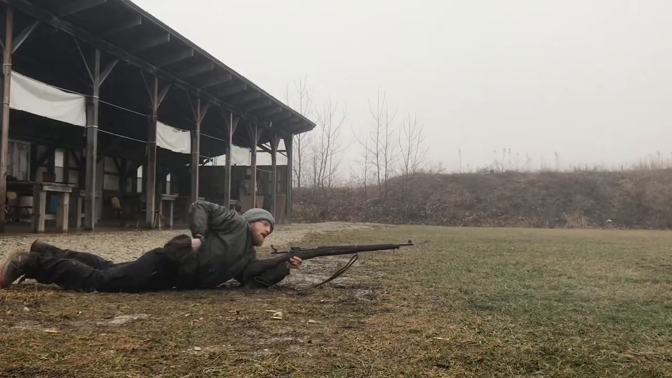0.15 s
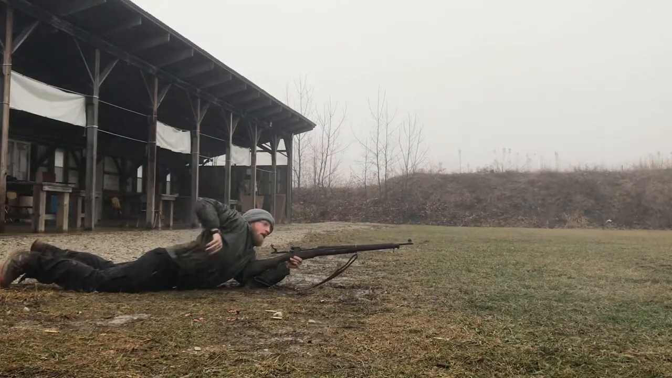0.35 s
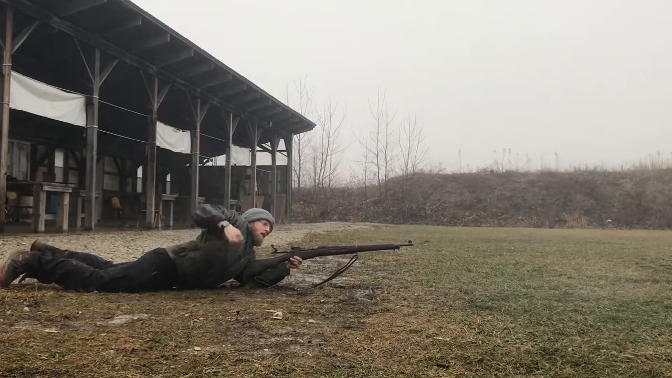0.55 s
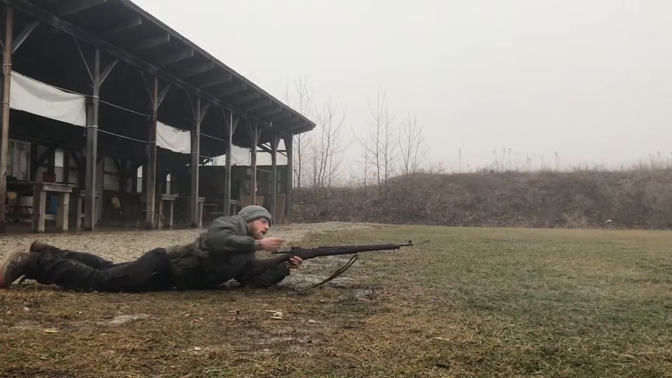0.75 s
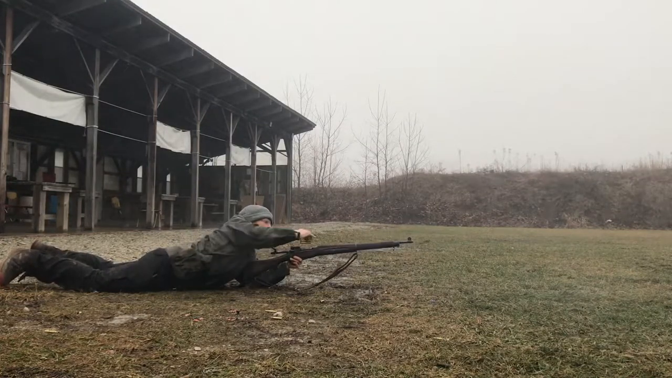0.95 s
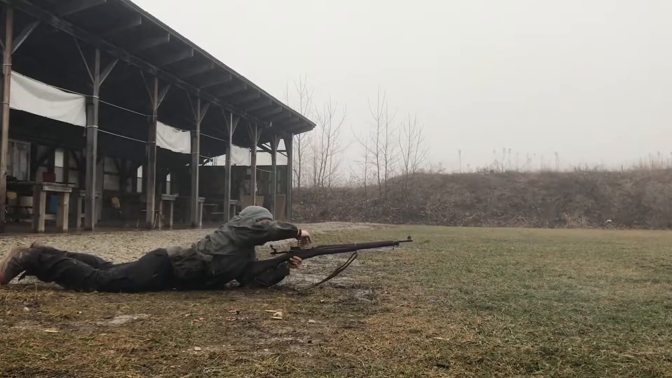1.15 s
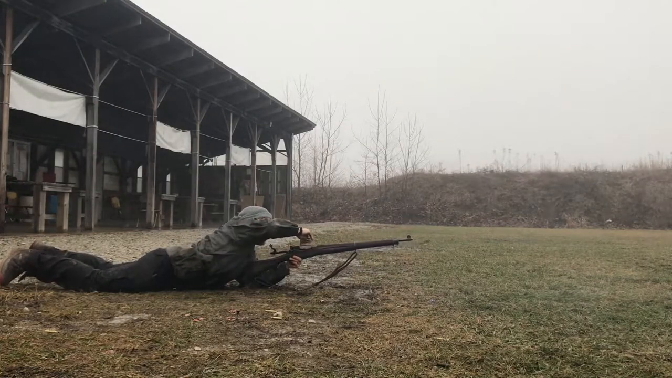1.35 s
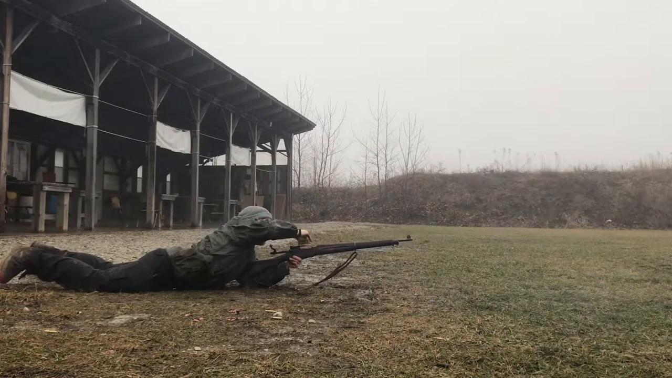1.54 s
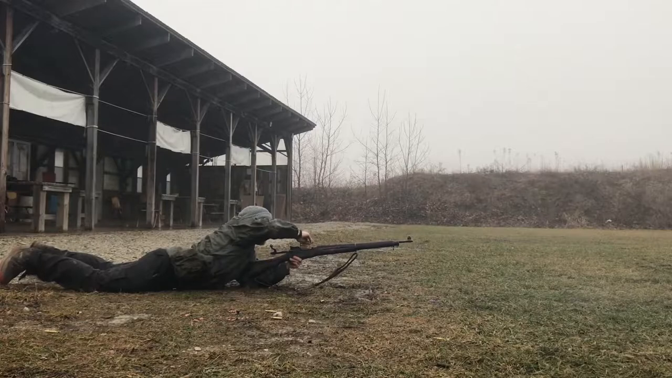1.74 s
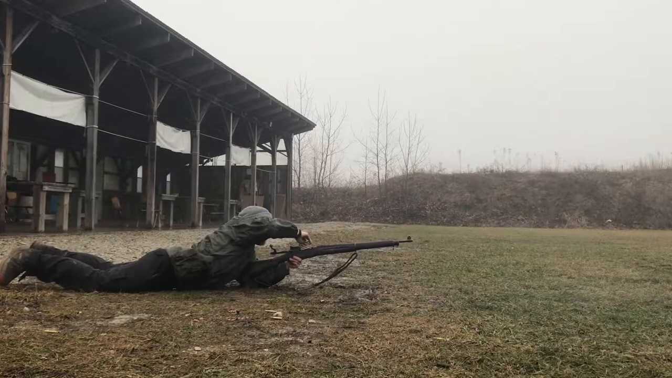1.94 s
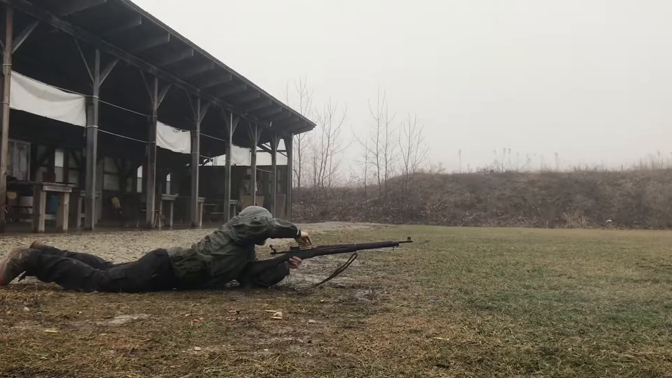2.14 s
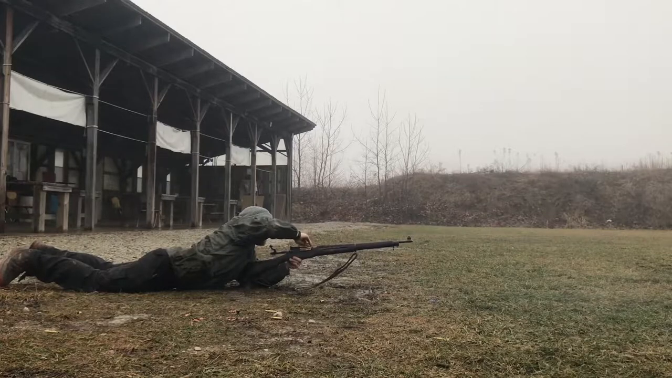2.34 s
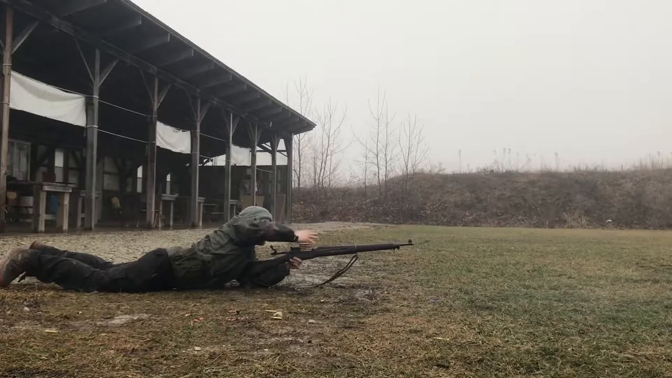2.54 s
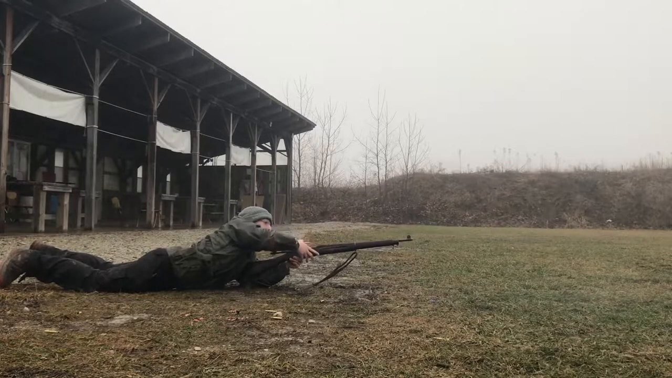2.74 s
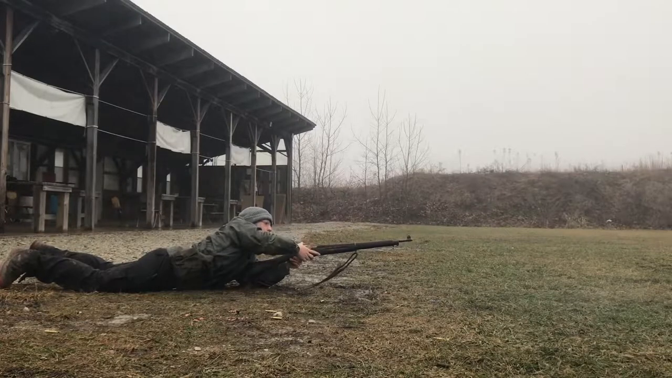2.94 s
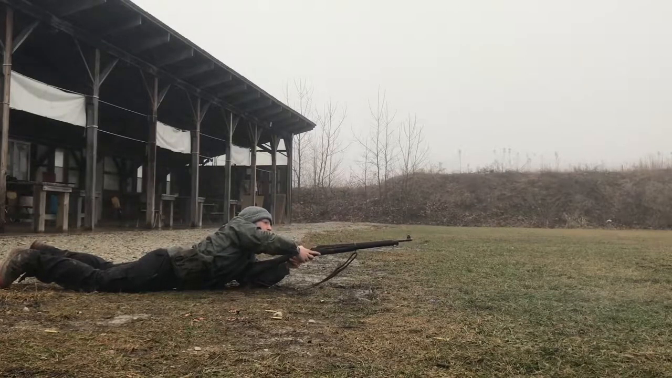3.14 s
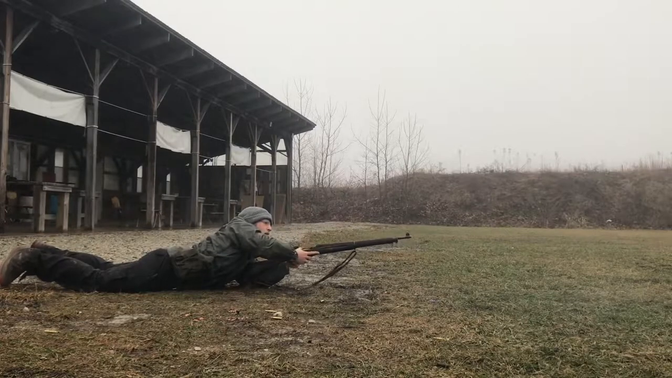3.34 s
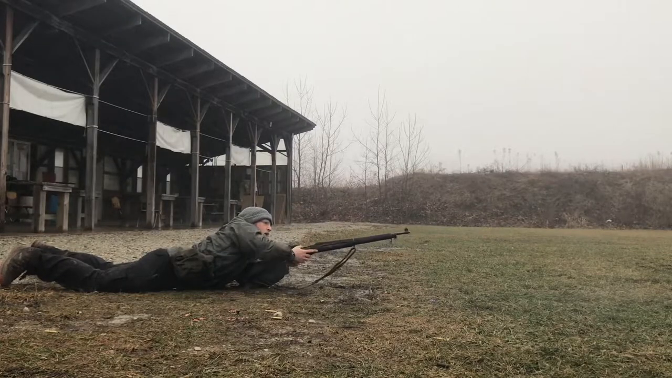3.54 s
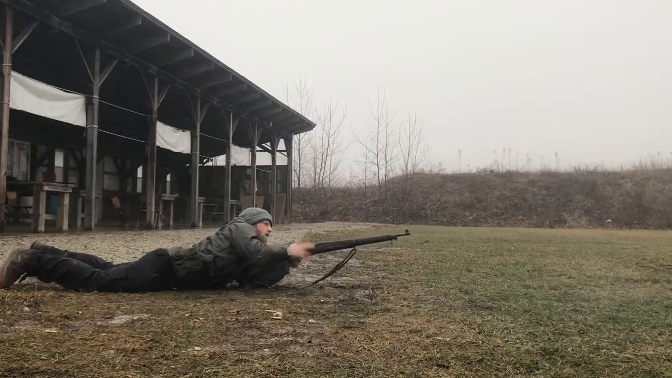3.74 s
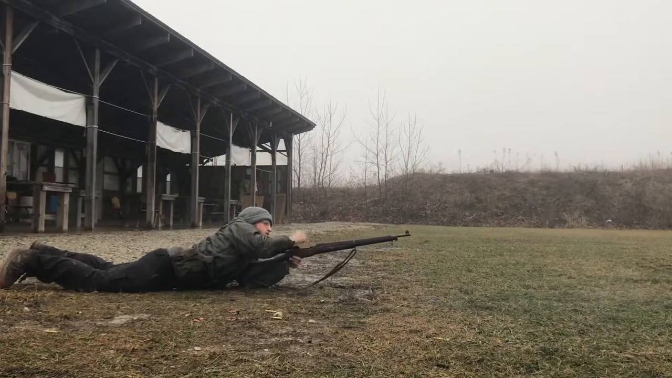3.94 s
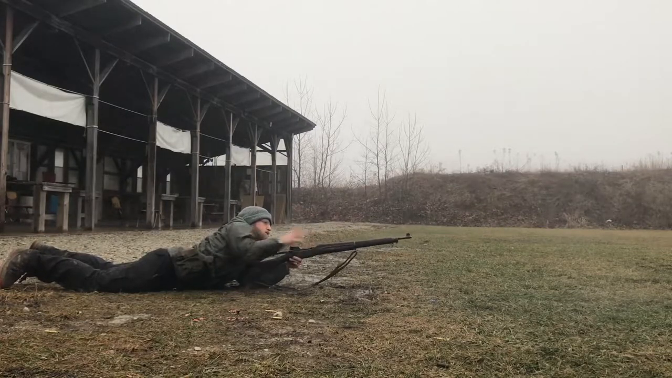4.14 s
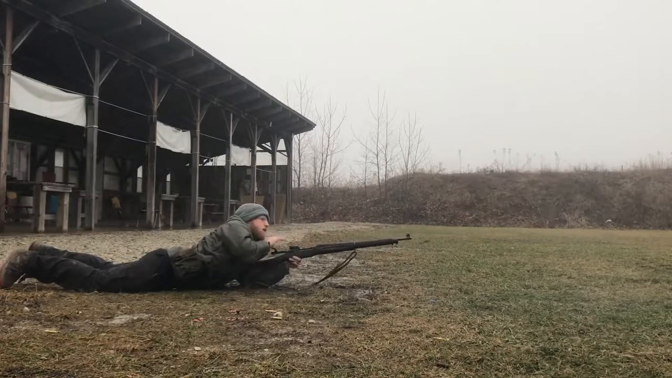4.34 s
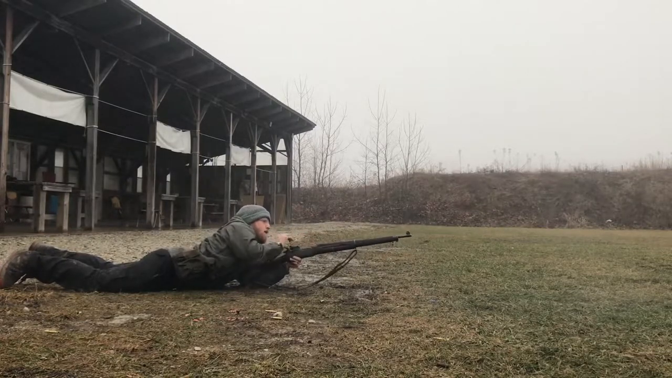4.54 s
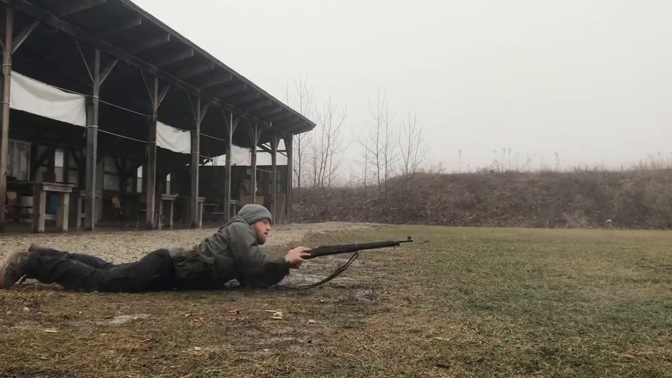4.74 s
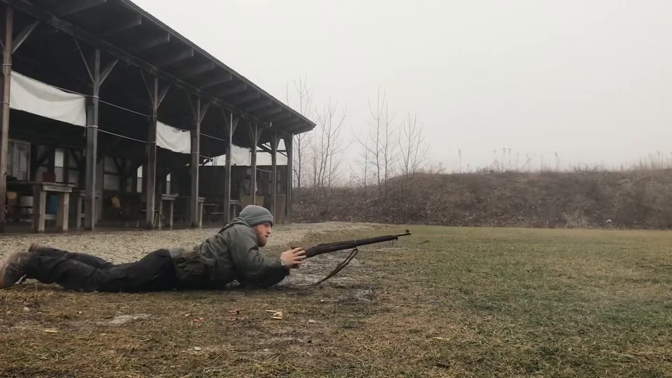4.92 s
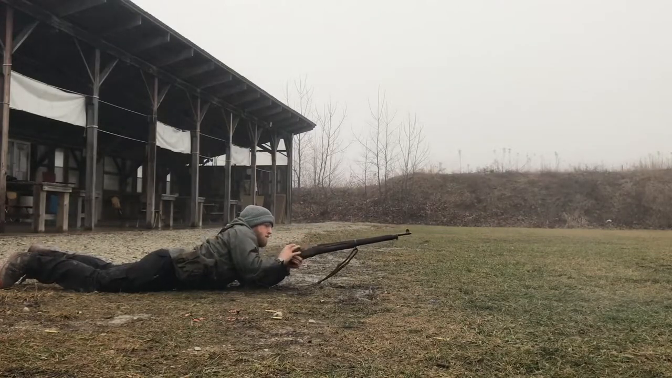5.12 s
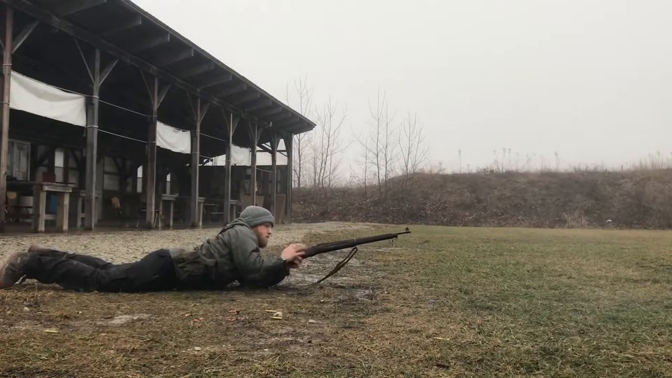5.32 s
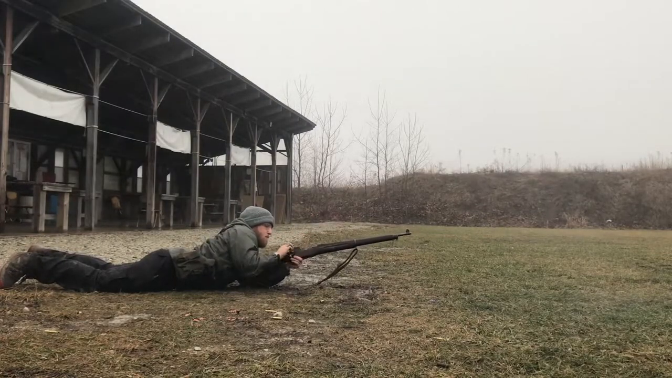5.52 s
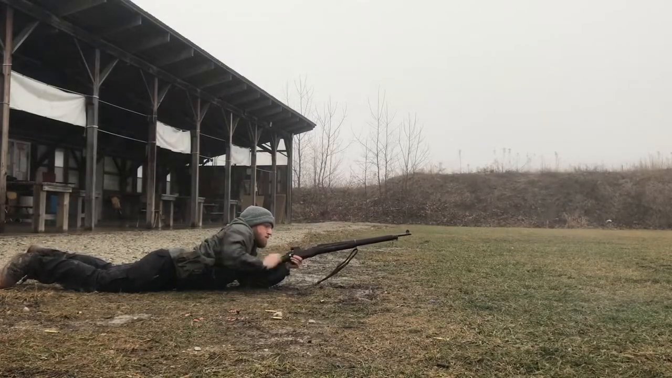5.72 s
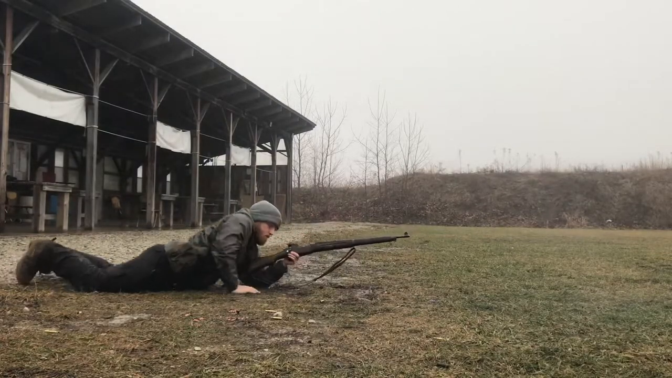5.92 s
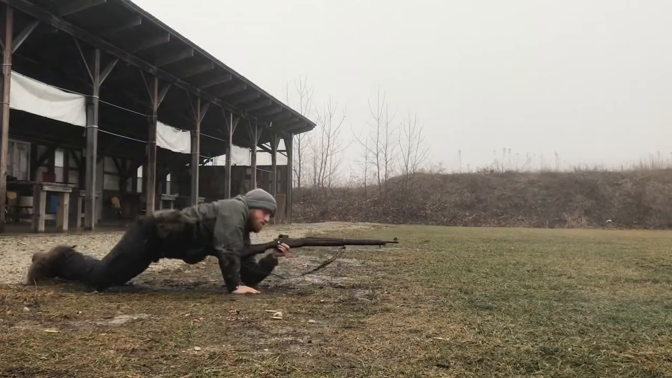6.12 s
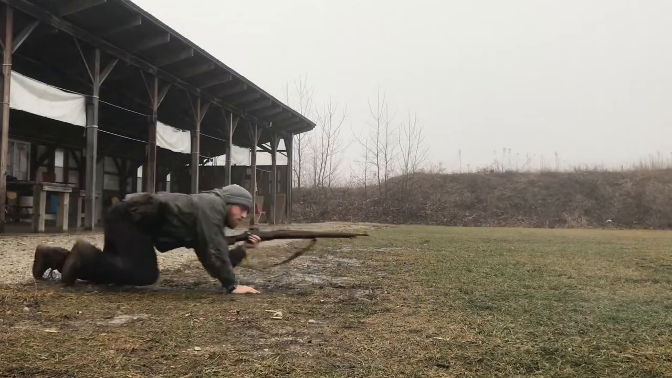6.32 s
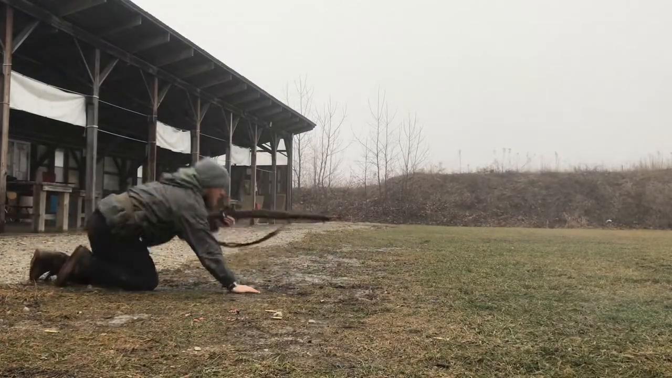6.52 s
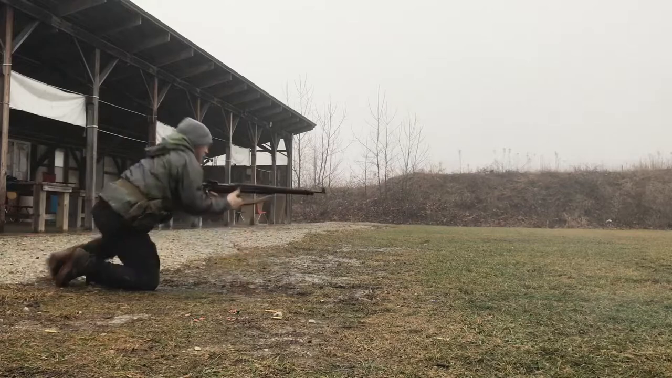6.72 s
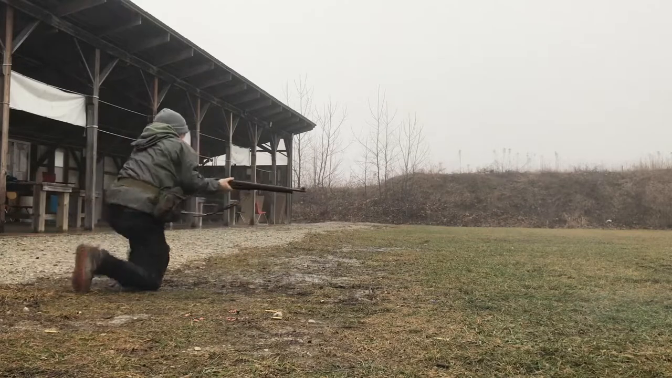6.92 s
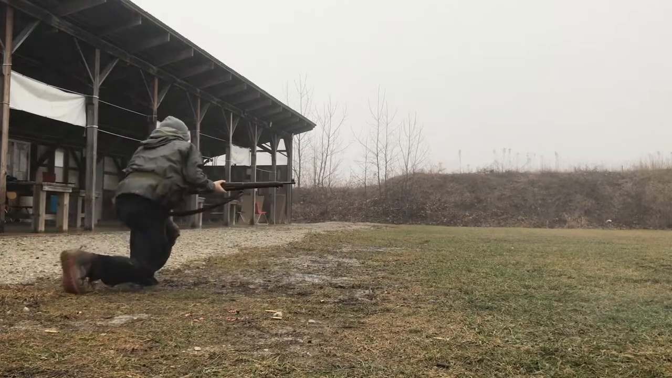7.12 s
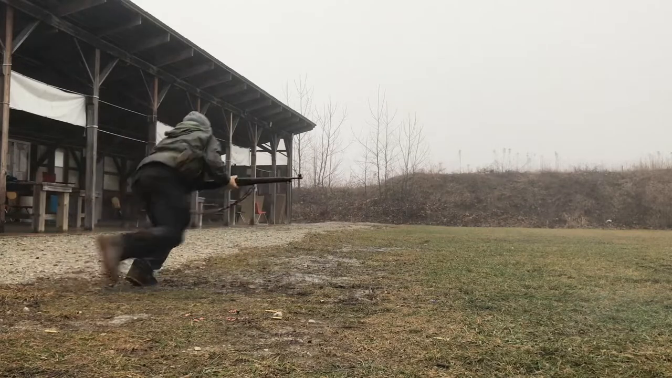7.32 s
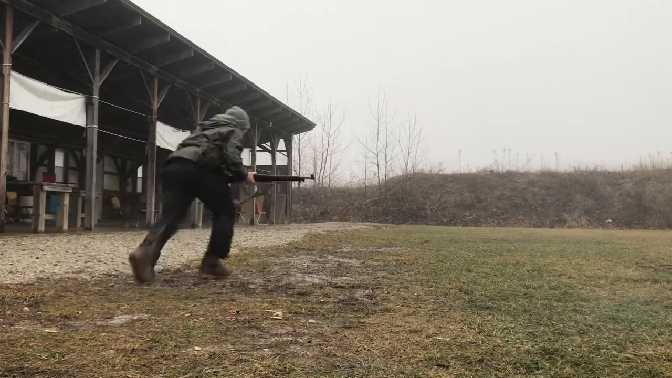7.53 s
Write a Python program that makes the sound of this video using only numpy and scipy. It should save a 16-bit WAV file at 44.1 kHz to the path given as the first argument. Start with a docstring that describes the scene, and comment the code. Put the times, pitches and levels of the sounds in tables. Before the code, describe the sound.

A faint rumble of distant traffic and open-air hiss runs throughout, with a far engine note swelling and fading. In the first second a sleeve rustles softly with a small bump. Light metal ticks follow as a bolt-action rifle is loaded nearby, becoming firmer clicks from 2 to 2.5 seconds. From about 3 to 3.6 seconds comes a run of sharp steel clacks and short slides, some ringing slightly. A click and a sleeve swish come around 4 seconds, then the bolt is worked in a loud, quick cluster from 4.4 to 4.8 seconds. Another sharp clack lands at 5.7 seconds. The metal sounds echo lightly off a wooden shed. From 5.8 seconds the shooter gets up: clothing rustles and rubs, grass crackles, and the rifle rattles lightly. Knees and boots scuff and thud around 6.8, 7 and 7.6 seconds.

```python
"""Wet grass in front of an open wooden shed. A prone shooter loads a bolt-action rifle, works the bolt
and gets up. Chattering steel contacts drive the modes of stock, action and small parts; the bolt rings.
Cloth rustles and rubs, folds and stems crackle, elbows and boots thud. The shed echoes the rifle
over distant traffic rumble and a wavering engine note."""
import sys
import numpy as np
from scipy import signal
from scipy.fft import rfft, irfft
from scipy.io import wavfile
from scipy.ndimage import uniform_filter1d

SR = 44100
rng = np.random.default_rng(int(sys.argv[2]) if len(sys.argv) > 2 else 0)


def generate_wav(signal):
    """Clip the signal to [-1, 1] and save it as 16-bit WAV at the path in sys.argv[1]."""
    frames = np.transpose(np.atleast_2d(signal))
    scaled = np.clip(frames, -1, 1) * 32767
    pcm = np.round(scaled).astype(np.int16)
    wavfile.write(sys.argv[1], SR, pcm)


N = 338247

# Traffic and open air. Each row: frequency in Hz, relative density in dB.
AIR_SPECTRUM = [(26, -25), (48, -3), (74, -4.5), (104, -9), (225, -21.5), (381, -31.5), (503, -35),
                (646, -33.5), (784, -35), (2310, -47), (2880, -46), (10600, -52.5), (15200, -47.5),
                (16500, -54)]
# Far engine. Each row: time in seconds, level in dB.
ENGINE_LEVELS = [(0, -69), (1.8, -78), (2.1, -55), (2.7, -62), (2.9, -54), (4.0, -56.5), (4.7, -82.5),
                 (5.4, -58.5), (6.9, -77), (7.67, -61)]
# Shed decay. Each row: frequency in Hz, t60 in seconds.
SHED_DECAY = [(300, 1), (1000, 0.37), (2200, 0.48), (3000, 0.72), (6000, 0.76), (16000, 0.65)]
# Echo colour. Each row: frequency in Hz, relative gain in dB.
SHED_SPECTRUM = [(300, -11), (900, 9.5), (2000, -0.5), (2550, -3), (2850, -0.5), (3400, -7.5), (4200, -5),
                 (5000, -10.5), (6500, -10), (7800, -7.5), (9200, -5.5), (16000, -2.5)]
# Cloth friction. Each row: frequency in Hz, relative density in dB.
CLOTH_SPECTRUM = [(120, 6), (220, 5), (650, 1.5), (1800, -5.5), (2500, -7), (2950, -2), (4250, -5),
                  (4800, -10.5), (6200, -8.5), (7600, -18.5), (10300, -18.5), (15100, -12.5), (16000, -15)]
# Cloth pressure, one curve a movement. Each row: time in seconds, relative mid-band level in dB.
REACH_LEVELS = [(0, -63), (.12, -65), (.15, -68), (.33, -70), (.5, -82), (.56, -73), (.66, -95), (.76, -77),
                (.84, -69), (.93, -72), (1.1, -83)]
SLEEVE_LEVELS = [(4.12, -66), (4.14, -61.5), (4.25, -63.5), (4.36, -66.5), (4.42, -76.5), (4.5, -71.5),
                 (4.545, -65)]
GET_UP_LEVELS = [(5.69, -73), (5.74, -66), (5.8, -78), (5.86, -58.5), (5.94, -68.5), (6.0, -64.5),
                 (6.12, -60.5), (6.21, -59), (6.27, -60), (6.4, -63), (6.51, -59), (6.66, -66), (6.71, -63),
                 (6.76, -60), (6.89, -62.5), (6.98, -73), (7.05, -58), (7.18, -65.5), (7.25, -61),
                 (7.3, -69.5), (7.41, -69), (7.46, -68.5), (7.55, -65.5), (7.6, -62), (7.67, -58)]
# Sleeve, elbow, knee and boot scuffs. Each row: peak time in seconds, relative mid-band level in dB,
# rise and fall in seconds, hiss and body in dB against the mid band.
CLOTH_SCUFFS = [(.335, -67, 0.025, 0.016, 4, -6), (.44, -68, 0.16, 0.085, 4.5, -4),
                (.57, -67, 0.05, 0.097, 4, 4), (.79, -67.5, 0.082, 0.072, 8, 6.5),
                (4.127, -54, 0.0014, 0.015, 3, 6.5), (6.0, -67.5, 0.059, 0.075, 10, 6),
                (6.371, -54.5, 0.0059, 0.015, 5.5, -3), (6.809, -46.5, 0.06, 0.022, -1, -2.5),
                (6.89, -58, 0.03, 0.035, 6.5, -4), (7.022, -45.5, 0.0084, 0.014, -2, 4.5),
                (7.34, -60.5, 0.078, 0.086, -14, -1), (7.651, -46, 0.02, 0.059, 0, -6.5)]
# Hand, sleeve and sling rubs. Each row: start and end in seconds, pitch and width in Hz, level in dB.
HOLLOW_RUBS = [(0, 0.128, 950, 260, -58.5), (0, 0.135, 3600, 420, -65.5), (0, 0.124, 5570, 500, -76),
               (0.145, 0.248, 765, 200, -67.5), (0.728, 0.873, 4540, 2500, -69.5),
               (4.138, 4.363, 3450, 300, -71.5), (6.02, 6.25, 3040, 495, -69),
               (6.483, 6.53, 2900, 600, -56), (6.761, 6.826, 2930, 900, -52.5),
               (7.016, 7.043, 2500, 1310, -39.5), (7.6, 7.655, 1150, 600, -53)]
# Fingers, folds, stems and sling. Each row: start in seconds, peak in dB, pitch in Hz.
FAINT_CRACKLES = [(0.441, -52, 4500), (0.693, -58, 2460), (.706, -56, 3850), (0.9016, -49, 5700),
                  (1.222, -53.5, 4640), (1.276, -62, 3600), (1.396, -63, 4050), (1.69, -55, 1670),
                  (2.589, -54.5, 2520), (2.734, -56, 1880), (2.761, -53, 6200), (2.8026, -52.5, 2940),
                  (2.8223, -54, 2200), (2.841, -54, 2500), (3.7357, -52, 3530), (4.1, -53, 3020),
                  (4.134, -45, 3220), (4.6302, -48, 3930), (6.061, -41, 3040), (6.17, -52, 3400),
                  (6.201, -45, 3270), (6.257, -42, 2930), (6.4078, -37, 2920), (6.681, -48, 3000),
                  (6.762, -50, 4200), (6.804, -41, 3280), (6.833, -42.5, 5500), (7.048, -45, 2940),
                  (7.082, -48, 1500), (7.198, -50, 4560), (7.309, -49, 3800), (7.326, -54, 4500),
                  (7.356, -66, 4800), (7.384, -55, 3300), (7.509, -54, 2600), (7.553, -49, 2000),
                  (7.624, -49, 4200)]
# Bolt, elbow, knee and boot knocks. Each row: start in seconds, level in dB, pitch in Hz, t60 in seconds.
DULL_KNOCKS = [(0.319, -66, 166, 0.025), (0.549, -45.5, 147, 0.03), (4.124, -47, 288, 0.064),
               (5.756, -37.5, 725, 0.0065), (5.776, -39.5, 194, 0.011), (6.797, -46.5, 313, 0.12),
               (6.823, -44, 213, 0.072), (7.002, -47.5, 280, 0.085), (7.02, -50, 115, 0.07),
               (7.601, -47.5, 149, 0.053), (7.643, -38.5, 177, 0.036)]
# Bolt ringing. Each row: start in seconds, level in dB, seconds until a touch damps it.
BOLT_RINGS = [(2.049, -67, .036), (2.976, -65, .05), (3.09, -67, .05), (3.149, -54, .09), (3.623, -65, .12),
              (4.431, -79, .05), (4.57, -56, .05), (4.671, -64, .03), (4.702, -68, .04),
              (5.667, -61, 0.032)]
# Wooden stock, steel action, small parts. Each row: frequency in Hz, width in Hz, relative gain in dB.
STOCK_MODES = [(683, 200, -4.5), (800, 240, -3), (1110, 390, -9.5), (1745, 53, -10)]
ACTION_MODES = [(2790, 305, -1), (3450, 810, -7.5), (4190, 620, 2), (5260, 380, -5), (6180, 800, -3)]
SMALL_PART_MODES = [(8360, 1200, 0.5), (9660, 220, 5.5), (11500, 380, -9.5), (12940, 6500, 0),
                    (16140, 690, -5)]
# Metal contacts. Each row: start in seconds, action level over 5 ms in dB, struck part in Hz, stock in dB
# against the action, stock pitch in Hz, small parts in dB against the action, nominal decay in seconds.
CONTACTS = [(0.409, -58, 4540, -5, 1460, -9, 0.094), (0.489, -59.5, 4500, -24, 670, -7, 0.016),
            (0.718, -67.5, 7100, -18, 700, 11, 0.022), (0.883, -53.5, 6240, -28, 930, -1, 0.028),
            (0.912, -83.5, 2430, 26, 890, -9, 0.0091), (1.165, -60.5, 4200, 5.5, 950, 0, 0.031),
            (1.2888, -61, 4700, -2, 1310, -0.5, 0.047), (1.301, -63.5, 4670, -6, 1100, 0, 0.016),
            (1.37, -61, 6460, -20, 1250, 7, 0.019), (1.5091, -54.5, 4570, -8, 1000, -1, 0.02),
            (1.512, -54, 4800, -1.5, 1300, 2, 0.027), (1.526, -66.5, 3800, 12, 990, -4, 0.042),
            (1.5403, -53, 2920, 4.5, 960, -5, 0.017), (1.6487, -59, 6000, 7.5, 1330, -24, 0.021),
            (1.8114, -59.5, 6240, -4.5, 800, 3, 0.031), (1.9426, -63.5, 4400, -6, 1000, 0, 0.028),
            (1.988, -40.5, 6330, -11, 1720, -1.5, 0.016), (1.995, -56, 6100, -1.5, 1430, 5, 0.026),
            (2.0477, -48, 4000, -5.5, 1340, 6.5, 0.028), (2.0849, -49, 4240, -4, 1720, -12, 0.021),
            (2.092, -64, 4430, 4, 1700, -5, 0.082), (2.1232, -46.5, 6440, -4.5, 1700, 4, 0.034),
            (2.408, -43, 3430, 1.5, 905, -2, 0.025), (2.4275, -51, 2800, -20, 1100, -2, 0.014),
            (2.451, -50.5, 4920, -7, 1790, -12, 0.042), (2.4605, -53, 4770, 0, 1770, -7, 0.052),
            (2.49, -78, 6200, -8, 950, 20, 0.021), (2.556, -53.5, 4160, -1, 960, -9.5, 0.025),
            (2.864, -60, 5000, 2.5, 800, -23, 0.025), (2.9712, -39.5, 3900, -11, 870, -6, 0.024),
            (2.9753, -33.5, 3140, -10.5, 1760, -1.5, 0.021), (3.09, -38.5, 5270, -7, 1740, -4.5, 0.018),
            (3.1392, -37, 4670, -13, 1650, -11, 0.048), (3.1557, -33.5, 3050, -9, 1750, -4, 0.023),
            (3.238, -53, 4100, 0, 835, -4.5, 0.02), (3.269, -51.5, 3700, -21, 1000, -18, 0.021),
            (3.398, -33, 3540, -12.5, 1340, -24, 0.03), (3.411, -38, 4600, -10, 1960, -6.5, 0.0074),
            (3.4142, -45, 4170, -2, 1110, -4, 0.068), (3.4284, -46.5, 4960, -14, 970, 0, 0.02),
            (3.564, -44.5, 4060, -15, 1920, -1.5, 0.032), (3.6222, -42.5, 3340, -12, 1770, -6, 0.022),
            (3.626, -42, 3470, -3.5, 1740, -1.5, 0.024), (3.759, -60.5, 5240, 2.5, 930, -6, 0.036),
            (4.0026, -54.5, 3960, -18, 1500, -6, 0.063), (4.0232, -42.5, 3900, -15, 786, 1, 0.021),
            (4.4227, -55, 3700, 3, 684, -3, 0.061), (4.4303, -41.5, 5300, -6.5, 1670, -13, 0.017),
            (4.5676, -30.5, 4700, -13.5, 1040, 1.5, 0.04), (4.574, -34.5, 4250, -7.5, 1760, -4, 0.018),
            (4.5791, -38, 3660, -4.5, 734, 2.5, 0.022), (4.625, -49.5, 2800, -20, 2100, -8, 0.013),
            (4.6603, -45, 6940, -8.5, 1310, 1.5, 0.016), (4.67, -35.5, 6400, -5, 1430, 2, 0.031),
            (4.719, -68, 3370, 14, 1490, -16, 0.022), (4.784, -49, 3870, -4, 1027, -6, 0.055),
            (4.793, -34.5, 6260, -17, 1730, 0.5, 0.0027), (4.8, -32, 3580, -1.5, 610, -11, 0.02),
            (4.829, -63, 3320, 11, 910, 6, 0.014), (5.634, -62, 4330, -15, 1300, -2, 0.012),
            (5.644, -47, 4370, -3, 1300, -10, 0.023), (5.6586, -45.5, 4020, 2, 1440, -24, 0.061),
            (5.6653, -31.5, 6030, -6, 1260, 0, 0.0095), (5.974, -48.5, 3340, -6.5, 1870, -6, 0.073),
            (6.359, -63, 2980, -6, 1290, 7, 0.017), (6.4367, -52.5, 2900, -7, 1220, -6, 0.032),
            (6.5292, -54, 4000, -24, 1610, 0.5, 0.065), (6.622, -57.5, 4000, -15, 730, 2, 0.033),
            (7.5273, -57, 3660, -0.5, 1210, 1.5, 0.017), (7.574, -48, 2430, -3, 1760, -27, 0.06),
            (7.592, -46.5, 2930, -2.5, 1140, -25, 0.036), (7.6413, -41.5, 5260, -2.5, 2030, 0.5, 0.027)]
# Parts sliding home. Each row: as in CONTACTS, then rise in seconds.
SLIDES = [(2.39, -59, 3720, 3, 1000, 6, 0.025, 0.017), (2.941, -58, 4000, -9, 1000, -2, .02, 0.023),
          (2.962, -42, 3050, 3, 940, -4, 0.057, 0.0055), (3.147, -31, 4770, -5.5, 950, -4, 0.029, 0.0014),
          (3.38, -47, 3480, -8, 765, -23, 0.037, 0.0092), (3.557, -47.5, 3740, -7, 1780, -2, 0.047, 0.0017),
          (4.526, -48, 3670, -4.5, 1110, -22, 0.068, 0.0034),
          (4.546, -35, 3440, -2, 1560, -9, 0.041, 0.0069),
          (4.699, -35.5, 3500, -4, 1440, -12, 0.017, 0.0032)]


def gain_of(db):
    """Decibels to amplitude."""
    return 10 ** (np.asarray(db) / 20)


def unit_rms(x):
    """Scales to rms 1."""
    return x / np.sqrt(np.mean(abs(x) ** 2) + 1e-20)


def curve_at(points, hz):
    """Interpolates a table over log frequency."""
    table_hz, value = np.transpose(points)
    return np.interp(np.log(hz + 1), np.log(table_hz + 1), value)


def add(mix, start_s, sound):
    """Mixes a sound in at start_s."""
    part = mix[round(start_s * SR):][:len(sound)]
    part += sound[:len(part)]


def resonance(hz, centre_hz, width_hz):
    """Complex response of one mode."""
    return 1 / (1 + 1j * (hz ** 2 - centre_hz ** 2) / (hz + 1) / width_hz)


def modes(table, hz, coupling):
    """Sum of modes; the contact point sets the sign and strength of each."""
    return sum(np.sign(drive) * gain_of(db + 0.63 * min(abs(drive), 1.5)) * resonance(hz, mode_hz, width)
               for (mode_hz, width, db), drive in zip(table, coupling))


def noise(db, size):
    """Noise from random short-time spectra; db is bins x frames."""
    real, imag = rng.standard_normal((2,) + db.shape[::-1]).transpose(0, 2, 1)
    return signal.istft((real + 1j * imag) * gain_of(db), nperseg=size, noverlap=size * 3 // 4)[1][:N]


def patches(frames, bins, long, wide):
    """Random blobs over time and frequency, rms 1."""
    streaks = uniform_filter1d(rng.standard_normal((frames, bins)), long, axis=0)
    return unit_rms(uniform_filter1d(streaks, wide, axis=1)).T


def air(level_db=-57):
    """Distant traffic rumble and faint open-air hiss."""
    frames, hz = N // 512 + 5, np.fft.rfftfreq(2048, 1 / SR)
    spectrum_db = curve_at(AIR_SPECTRUM, hz)[:, None] + patches(frames, len(hz), long=8, wide=12)
    return gain_of(level_db) * unit_rms(noise(spectrum_db, size=2048))


def engine(pitch_hz=97, waver_hz=1.56):
    """A far engine: one wavering note that swells and fades."""
    drift = unit_rms(uniform_filter1d(uniform_filter1d(rng.standard_normal(N), 5000), 5000))
    note = np.sin(2 * np.pi * np.cumsum(pitch_hz + waver_hz * drift) / SR)
    return gain_of(np.interp(np.arange(N) / SR, *np.transpose(ENGINE_LEVELS))) * note


def shed_echo(sound, pattern, gap_s=0.009, turn_s=0.693):
    """Sparse echoes off posts and roof; each band dies at its own rate."""
    taps = np.zeros(SR)
    arrivals = np.arange(0, SR - 20, 20) + rng.integers(0, 20, (SR - 1) // 20)
    taps[arrivals] = rng.choice([-1., 1.], len(arrivals))
    hz, t, spectra = signal.stft(taps, SR, nperseg=256)
    build = np.clip((t - gap_s) / 0.0094, 0, 1)
    far_end = 1 + 0.41 * np.exp(-((t - 0.08) / 0.052) ** 2)
    decay_db = curve_at(SHED_SPECTRUM, hz)[:, None] - 60 * t / curve_at(SHED_DECAY, hz)[:, None]
    echo = signal.istft(spectra * build * far_end * gain_of(decay_db), SR, nperseg=256)[1]
    # Patterns 0 and 1 take turns as the shooter shifts.
    share = np.cos(np.pi * (np.arange(N) / SR / turn_s + pattern / 2))
    return signal.fftconvolve(sound * share, echo / np.linalg.norm(echo))[:N]


def cloth_power(t, scuff_drop_db=13.5):
    """Friction power of movements and scuffs in three bands: mid, hiss, body."""
    power = np.full((3, len(t)), 1e-12)
    movements = (REACH_LEVELS, -2, 6.5), (SLEEVE_LEVELS, 3.5, 2), (GET_UP_LEVELS, -1.8, 1.8)
    for curve, hiss_db, body_db in movements:
        times_s, level_db = np.transpose(curve)
        bands_db = np.interp(t, times_s, level_db) + np.array([[0], [hiss_db], [body_db]])
        power += gain_of(2 * bands_db) * ((t >= times_s[0]) & (t <= times_s[-1]))
    for peak_s, level_db, rise_s, fall_s, hiss_db, body_db in CLOTH_SCUFFS:
        mid_db = level_db - scuff_drop_db * np.maximum((peak_s - t) / rise_s, (t - peak_s) / fall_s)
        power += gain_of(2 * (mid_db + np.array([[0], [hiss_db], [body_db]])))
    return power


def cloth(fibres_per_s=120):
    """Patchy friction hiss; blades and folds snap as broadband grains, fibres let go."""
    frames, hz = N // 64 + 5, np.fft.rfftfreq(256, 1 / SR)
    bands = (hz > 1700) & (hz < 7000), hz >= 7000, hz <= 1700
    colour_db = curve_at(CLOTH_SPECTRUM, hz)
    db = np.zeros((len(hz), frames))
    for band, power in zip(bands, cloth_power(np.arange(frames) * 64 / SR)):
        db[band] = colour_db[band, None] + 10 * np.log10(power / np.sum(gain_of(2 * colour_db[band])))
    snaps_db = 1.45 * np.minimum(rng.exponential(1, frames), 4)
    db += snaps_db * np.clip(0.63 + 1.03 * patches(frames, len(hz), long=1, wide=14), 0, 2)
    db += 1.67 * patches(frames, len(hz), long=14, wide=6)
    fibres = rng.exponential(1, N) * (rng.random(N) < fibres_per_s / SR)
    grit = 30 * uniform_filter1d(fibres, 30)
    return gain_of(-2.5) * noise(db, size=256) * (1 + 0.7 * grit)


def rub(length_s, pitch_hz, width_hz, level_db, rise_s=0.0087, stop_s=0.041):
    """Friction noise through a hollow resonance, stopping short."""
    t, hz = np.arange(16384) / SR, np.fft.rfftfreq(16384, 1 / SR)
    hollow = irfft(rfft(rng.standard_normal(len(t))) * resonance(hz, pitch_hz, width_hz) ** 2)
    envelope = np.clip(np.minimum(t / rise_s, (length_s - t) / stop_s), 0, 1)
    return gain_of(level_db) * unit_rms(hollow) * envelope


def crackle(peak_db, pitch_hz, t60_s=0.01, low_hz=700, high_hz=6000):
    """A brief noise burst, part broad, part resonant."""
    t, hz = np.arange(2048) / SR, np.fft.rfftfreq(2048, 1 / SR)
    burst = rfft(rng.standard_normal(len(t)) * np.minimum(t / 0.0011, 1) * gain_of(-60 * t / t60_s))
    broad = unit_rms(irfft(burst * (1j * hz / (low_hz + 1j * hz)) ** 2 / (high_hz + 1j * hz) ** 2))
    pitched = unit_rms(irfft(burst * resonance(hz, pitch_hz, width_hz=400)))
    sound = pitched + gain_of(-8) * broad
    return gain_of(peak_db) * sound / abs(sound).max()


def thud(level_db, pitch_hz, t60_s, rise_s=0.00078):
    """A damped low push with a dull puff of soil."""
    t = np.arange(6000) / SR
    band = signal.butter(1, [0.55 * pitch_hz, 2.3 * pitch_hz], "band", fs=SR)
    puff = unit_rms(signal.lfilter(*band, rng.standard_normal(len(t))))
    push = np.sin(2 * np.pi * pitch_hz * t)
    return gain_of(level_db - 60 * t / t60_s) * (push + 0.67 * puff) * (1 - np.exp(-t / rise_s))


def bolt_ring(level_db, free_s, pitch_hz=9260, t60_s=0.22):
    """The loose bolt's long high mode flutters until a touch damps it."""
    t = np.arange(12000) / SR
    gate = np.minimum(t / 0.0021, 1) * np.clip((free_s - t) / 0.008 + 1, 0, 1)
    flutter_db = 5 * unit_rms(uniform_filter1d(rng.standard_normal(len(t)), 150))
    return gain_of(level_db + flutter_db - 60 * t / t60_s) * np.sin(2 * np.pi * pitch_hz * t) * gate


def click(level_db, part_hz, stock_db, stock_hz, small_db, decay_s, rise_s=0.0011):
    """Contact chatter drives the rifle's modes. Returns the direct sound and the snap sent all around."""
    t, hz = np.arange(4096) / SR, np.fft.rfftfreq(4096, 1 / SR)
    grit, clumps = rng.standard_normal((2, len(t)))
    coupling = rng.standard_normal(16)
    chatter = grit * gain_of(2 * unit_rms(uniform_filter1d(clumps, 12)))
    fall_db = -60 * (np.maximum(t - rise_s, 0) / (0.78 * decay_s)) ** 1.56  # holds, then stops short
    first_blow = 1 + 0.73 * np.exp(-abs(t - rise_s) / 0.00076)
    envelope = np.minimum(t / rise_s, 1) ** 2 * gain_of(fall_db) * first_blow

    radiation = (1j * hz / (400 + 1j * hz)) ** 4  # a slim object radiates no bass
    struck = resonance(hz, part_hz, 500)
    stock = radiation * (modes(STOCK_MODES, hz, coupling) + gain_of(-0.5) * resonance(hz, stock_hz, 330))
    action = radiation * (modes(ACTION_MODES, hz, coupling[4:]) + gain_of(8.5) * struck)
    small_parts = modes(SMALL_PART_MODES, hz, coupling[9:])
    small_parts /= (1 + 1j * hz / (2.7 * part_hz)) ** 2  # deep parts are duller on top
    bare_contact = (1j * hz / (930 + 1j * hz)) ** 2
    groups = (stock, 1, stock_db), (action, 1, 0), (small_parts, 1.4, small_db), (bare_contact, 1.6, -21)
    direct = 0
    for response, damping, group_db in groups:
        direct += gain_of(group_db) * unit_rms(irfft(rfft(chatter * envelope ** damping) * response))
    ground_notch = 1 - 0.3 * gain_of(0.0071) * resonance(hz, 8000, 1200)
    direct = irfft(rfft(direct) * ground_notch)

    around_db = curve_at([(1500, stock_db + 5), (2500, 0), (6500, 0), (8000, small_db - 3)], hz)
    snap = irfft(gain_of(around_db) * (1 + gain_of(9.5) * abs(struck)))
    snap = np.roll(unit_rms(snap), 200)
    scale = gain_of(level_db) * np.sqrt(0.005 / t[-1]) * (t < 0.08)
    return scale * direct, scale * snap


def scene():
    """Rifle, body and cloth over the background; only clicks and rings reach the shed."""
    near, around = np.zeros((2, N))
    for start_s, *row in CONTACTS + SLIDES:
        direct, snap = click(*row)
        add(near, start_s, direct)
        add(around, start_s, snap)
    for start_s, *row in BOLT_RINGS:
        tone = bolt_ring(*row)
        add(near, start_s, tone)
        add(around, start_s, gain_of(6) * tone)
    for start_s, *row in DULL_KNOCKS:
        add(near, start_s, thud(*row))
    for start_s, *row in FAINT_CRACKLES:
        add(near, start_s, crackle(*row))
    for start_s, end_s, *row in HOLLOW_RUBS:
        add(near, start_s, rub(end_s - start_s, *row))
    echo = sum(shed_echo(around, pattern) for pattern in range(2))
    return (near + gain_of(-15.5) * echo + cloth() + air() + engine())[None]


def record(dry):
    """The microphone drops the deepest bass; the top is shelved down, then cut."""
    bass_hz, shelf_hz, top_hz = 40, 15800, 16750
    dry = signal.sosfilt(signal.butter(3, bass_hz, "high", fs=SR, output="sos"), dry)
    below_shelf = signal.oaconvolve(dry, signal.firwin(301, shelf_hz, fs=SR)[None], "same")
    shelved = below_shelf + gain_of(-26) * (dry - below_shelf)
    top_cut = signal.firwin(1023, top_hz, window=("kaiser", 10), fs=SR)
    return signal.oaconvolve(shelved, top_cut[None], "same")


dry = scene()
out = record(dry)
generate_wav(out)
```